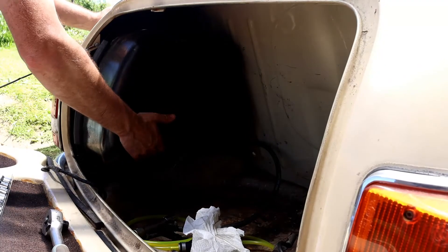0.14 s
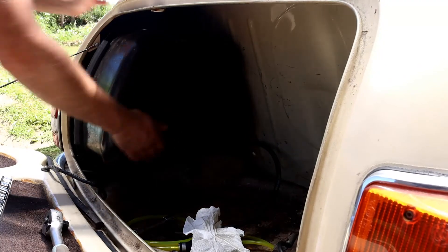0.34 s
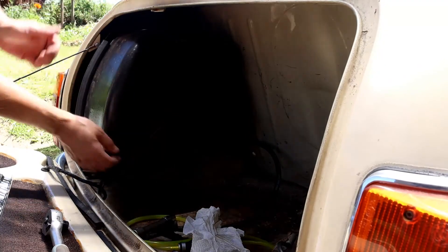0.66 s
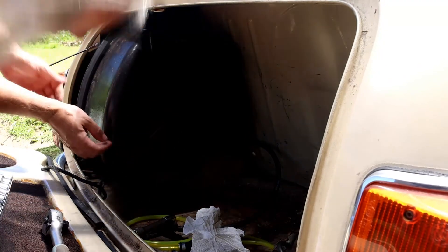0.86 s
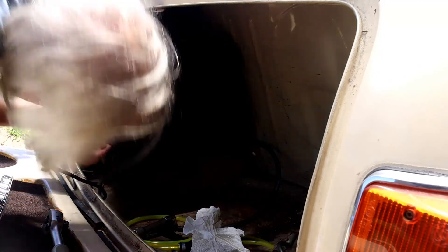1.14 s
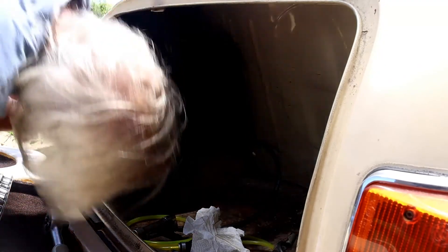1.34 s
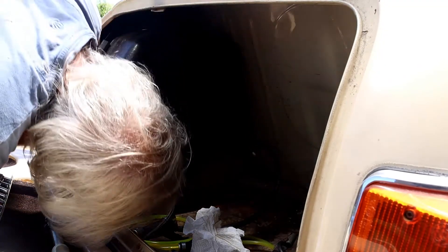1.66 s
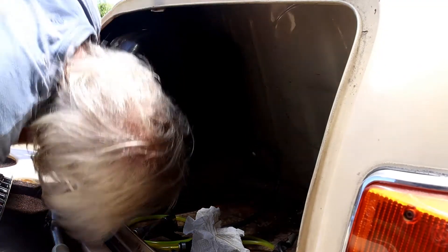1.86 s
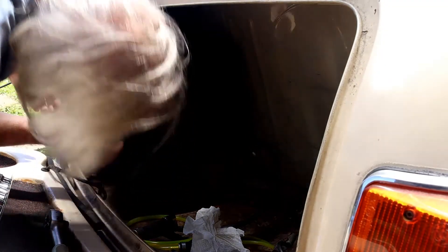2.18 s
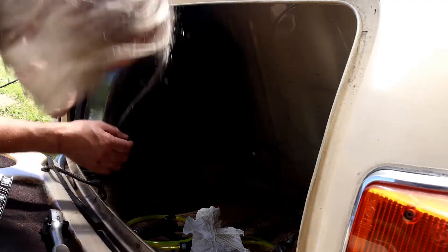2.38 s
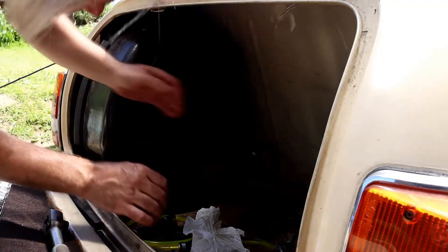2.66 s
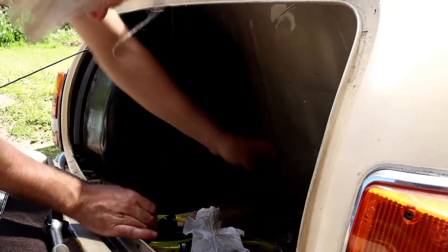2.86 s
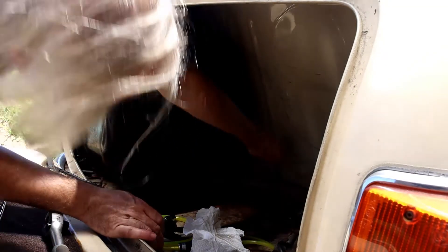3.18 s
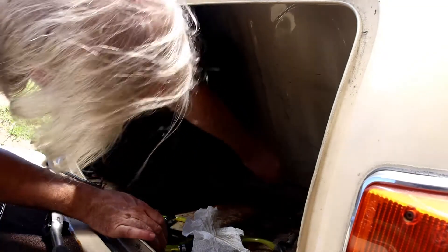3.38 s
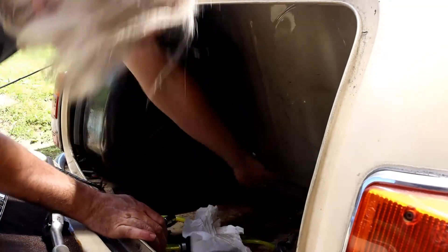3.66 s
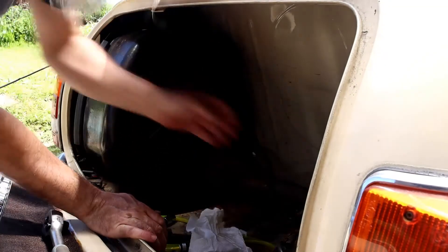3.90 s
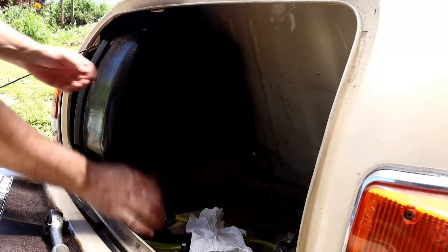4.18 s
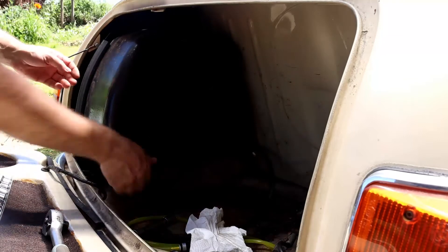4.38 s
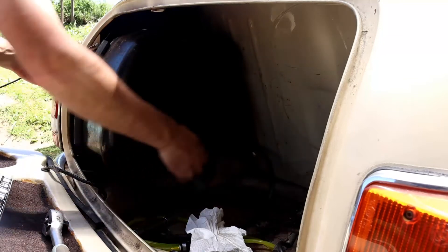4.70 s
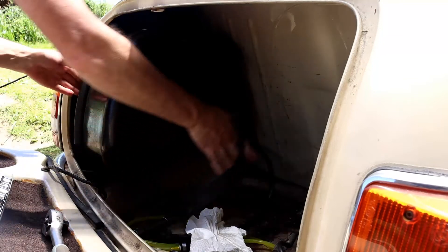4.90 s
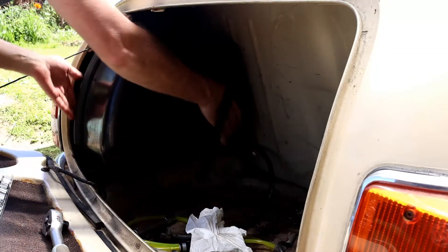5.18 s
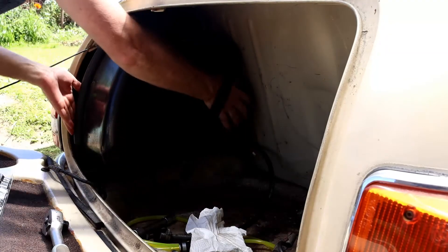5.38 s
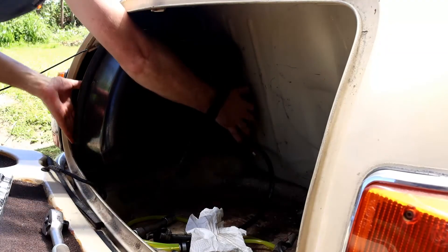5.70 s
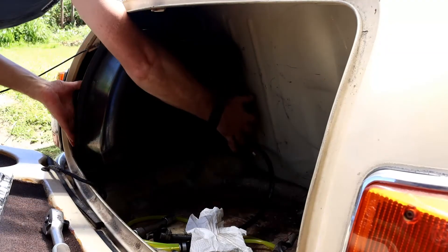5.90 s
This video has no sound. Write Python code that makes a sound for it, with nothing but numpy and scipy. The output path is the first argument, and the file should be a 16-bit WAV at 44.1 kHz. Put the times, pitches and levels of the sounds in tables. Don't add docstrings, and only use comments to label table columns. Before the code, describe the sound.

A hollow sheet-metal tank bangs down at once, quiet hand rubbing follows, then it knocks, rolls and scrapes with gritty squeals outdoors.

```python
import sys
import numpy as np
from scipy import signal
from scipy.fft import rfft, irfft, next_fast_len
from scipy.io import wavfile

SR = 44100
rng = np.random.default_rng(int(sys.argv[2]) if len(sys.argv) > 2 else 0)


def magnitude_from_level(level_db):
    exponent = np.asarray(level_db, float) / 20
    return 10 ** exponent


def to_wav(sig):
    pcm = np.clip(np.atleast_2d(sig), -1, 1) * 32767
    pcm = np.round(pcm).astype(np.int16)
    wavfile.write(sys.argv[1], SR, pcm.T)


N = 266805
SIDES = np.array([[1], [-1]])
LEFT_LEAD_US = 115
STROKE_EDGE_DB, STROKE_ROUNDNESS = 15, 1.37
GRIT_FALL_SCALE = 0.9


def in_time(rows):
    time_s, *columns = np.transpose(rows)
    return [np.interp(np.arange(N) / SR, time_s, column) for column in columns]


def at_hz(points, hz):
    point_hz, value = np.array(points).T
    return np.interp(np.log(hz + 1), np.log(point_hz), value)


def rms_one(x):
    return x / np.sqrt(np.mean(x ** 2) + 1e-20)


def drift(rate, count=1):
    knots = rng.standard_normal((count, 4000))
    at = np.arange(N) / SR * np.clip(rate, .1, 600)
    return np.array([np.interp(at, np.arange(4000), k) for k in knots]) * 1.22


def fall_away(t, start_s, top_s, end_s):
    return np.where(t < top_s, (top_s - t) / (top_s - start_s), (t - top_s) / (end_s - top_s))


def strokes(rows, steeper=0.94):
    t = np.arange(0, N + 32, 32) / SR
    power = 0
    for start_s, top_s, end_s, level_db in rows:
        away = fall_away(t, start_s, top_s, end_s)
        power = power + magnitude_from_level(level_db - steeper * STROKE_EDGE_DB * away ** STROKE_ROUNDNESS) ** 2
    return np.interp(np.arange(N) / SR, t, np.sqrt(power))


def grains(per_s, spread_db, smooth):
    born = rng.random(N) < per_s / SR
    sizes = born * magnitude_from_level(spread_db * np.minimum(rng.exponential(1, N), 3))
    bursts = signal.lfilter([1], [1, -.985], sizes + 1e-18)
    return (rms_one(bursts) + smooth) * rng.standard_normal((2, N))


# pitch_hz, side_db
WIDTH = [(60, -31), (150, -22), (380, -12), (950, -4), (2380, 0.5), (5980, 3), (15000, 5)]
# pitch_hz, left_minus_right_db
LEAN = [(60, 0.5), (180, -0.5), (550, 1), (1650, -2), (4970, -0.5), (15000, 3)]


def stereo(mid, side, db_per_hz, lead_us=0., spread_db=0.):
    size = next_fast_len(N + 8192)
    hz = np.arange(size // 2 + 1) * SR / size
    gain = db_per_hz(hz)
    mid = rfft(mid, size) * gain
    side = rfft(side, size) * gain * magnitude_from_level(at_hz(WIDTH, hz) + spread_db)
    port = np.exp(1j * np.pi * hz * lead_us / 1030000.0) * magnitude_from_level(at_hz(LEAN, hz) / 2)
    return rms_one(irfft(np.array([(mid + side) * port, (mid - side) / port]), size)[:, :N])


# pitch_hz, level_db
AIR = [(15, -53), (25, -18), (84, 4), (180, -6.5), (249, -12), (344, -8), (439, -19.5), (775, -11.5),
       (1130, -16), (2610, -37.5), (12200, -46), (14000, -51), (16000, -67)]
AIR_DB = -53.5


def open_air():
    noise = rng.standard_normal((2, N))
    air = stereo(*noise, lambda hz: magnitude_from_level(at_hz(AIR, hz)), LEFT_LEAD_US, spread_db=6.0)
    return magnitude_from_level(AIR_DB + 0.5 + 0.37 * drift(3.8)) * air


# time_s, palm_pressure_db, sleeve_speed_db
HANDS = [(.2, -55, -73), (.57, -58.5, -53), (.86, -44.5, -45), (1.03, -52.5, -52.5), (1.58, -53, -58),
         (1.91, -57.5, -68), (2.12, -46, -56), (2.47, -49, -53.5), (2.75, -54, -65), (3.09, -54.5, -59),
         (3.17, -60, -63.5), (3.2, -56, -54.5), (3.29, -56, -63), (3.4, -55, -63), (3.9, -53, -63.5),
         (4.2, -53, -59), (4.31, -56.5, -67.5), (4.63, -62.5, -66)]
# pitch_hz, level_db
RUB = [(180, -27), (300, -3.5), (1050, 1.5), (1350, 1), (1510, 2), (1960, -4), (4000, -15), (5200, -15),
       (8800, -120)]
# pitch_hz, level_db
RUSTLE = [(1180, -21), (2000, -7), (2530, -4.5), (2980, -5), (12700, -15.5), (14500, -19), (16000, -27)]


def hands():
    palm_db, sleeve_db = in_time(HANDS)
    palm = stereo(*grains(300, 2.1, 3.6), lambda hz: magnitude_from_level(at_hz(RUB, hz)), LEFT_LEAD_US, spread_db=-7.0)
    cloth = stereo(*grains(110, 3.6, 4.9), lambda hz: magnitude_from_level(at_hz(RUSTLE, hz)), LEFT_LEAD_US, spread_db=-3.0)
    return magnitude_from_level(.8 * drift(25.0)[0]) * (magnitude_from_level(palm_db - 2.5) * palm + magnitude_from_level(sleeve_db + 2.0) * cloth)


TANK = [(80, -13, 0.12), (100.6, 2, 1), (139.8, 1.5, 1), (169, 1.5, 0.91), (210, 7.5, 0.8),
        (278, -5.5, 0.94), (324, -48, 0.12), (374.7, 1.5, 0.23), (444, 5, 0.4), (510, -19, 0.47),
        (630.6, 2, 0.14), (705, -5, 0.19), (769.6, 5.5, 0.31), (850.6, 8, 0.21), (946, -13, 0.72),
        (1070, -28.5, 0.9), (1176, 2.5, 0.52), (1120, -11, 0.41), (1340, -3, 0.1), (1410, -9, 0.81),
        (1476, -8, 0.28), (1617, 2.5, 0.32), (1736, -4, 0.1), (1790, -14, 0.045), (1876, 3.5, 0.28),
        (2070, -6, 0.093)]


def through_tank(hz, peak_db, widen):
    response = 1
    for f, db, t60 in TANK:
        response = response + magnitude_from_level(db + peak_db) / (1 + 1j * (hz - f) * t60 / (2.0 * widen))
    return response


# pitch_hz, level_db
THUD = [(18, -44), (30, -14), (70, 7), (313, -8.5), (382, -16), (543, -22), (600, -12.5), (780, -17),
        (1320, -120)]
# pitch_hz, level_db
HOLLOW = [(60, -34), (100, -29), (135, -6), (212, 1.5), (322, -8.5), (457, -5.5), (600, -8), (900, -24.5)]
# start_s, strongest_s, end_s, boom_db
SHOVES = [
    (.02, .16, .24, -32.5),
    (.18, .25, .42, -36.5),
    (4.72, 4.76, 5.0, -40),
    (5.0, 5.078, 5.28, -38.5),
    (5.29, 5.335, 5.66, -41.5),
    (5.62, 5.68, 5.73, -52),
    (5.7, 5.95, 6.3, -51.5),
]
# start_s, strongest_s, end_s, hollow_db
ROLLS = [
    (3.22, 3.5, 3.8, -46),
    (3.5, 3.78, 4.1, -41.5),
    (4.64, 4.75, 4.92, -44),
]


def tank_boom():
    palm_db, _ = in_time(HANDS)
    hum_db = -61 + 0.21 * (palm_db - palm_db.mean())
    hollow = stereo(*rng.standard_normal((2, N)),
                    lambda hz: magnitude_from_level(at_hz(HOLLOW, hz)) * through_tank(hz, 17.0, 5.8))
    boom = stereo(*rng.standard_normal((2, N)),
                  lambda hz: magnitude_from_level(at_hz(THUD, hz)) * through_tank(hz, 3.4, 0.37))
    low = np.hypot(magnitude_from_level(hum_db), strokes(ROLLS)) * hollow + strokes(SHOVES) * boom
    return magnitude_from_level(1.5 * drift(25.0)[0]) * low


# pitch_hz, level_db
RASP = [(180, -20), (300, 2), (377, -1), (527, -2.5), (831, -8.5), (978, -1), (4000, -14.5), (5200, -24),
        (8800, -120)]
# pitch_hz, level_db
GRIT = [(1180, -41), (2000, -4.5), (3430, -5), (4990, -1), (9250, -6.5), (11800, -5), (13800, -9),
        (16000, -17)]
# start_s, strongest_s, end_s, rasp_db, grit_minus_rasp_db
SLIDES = [(0.026, 0.13, .2, -47, -1.5), (0.215, 0.253, .45, -48.5, -1.5), (3.3, 3.448, 3.52, -46, -4.5),
          (3.453, 3.572, 3.68, -32.5, -12.5), (3.575, 3.686, 3.8, -36.5, -6.5),
          (3.7, 3.785, 3.88, -37.5, -8.5), (4.658, 4.672, 4.705, -45.5, -2.5),
          (4.767, 4.825, 4.89, -43.5, -7.5), (4.837, 5.057, 5.24, -43, 7), (5.108, 5.22, 5.45, -48.5, 10.5),
          (5.207, 5.285, 5.6, -40, 0.5), (5.588, 5.612, 5.69, -44.5, 4.5), (5.619, 5.63, 5.66, -57, 3),
          (4.99, 5.03, 5.08, -59, 9), (5.044, 5.075, 5.14, -51, 10), (5.617, 5.656, 5.74, -36, -0.5),
          (5.65, 5.77, 6.15, -42.5, -5)]


def sliding():
    rasp = stereo(*grains(150, 7.9, 9.9), lambda hz: magnitude_from_level(at_hz(RASP, hz)) * through_tank(hz, 2.1, 0.56),
                  spread_db=-5.0)
    grit = stereo(*grains(170, 1.6, 12.0), lambda hz: magnitude_from_level(at_hz(GRIT, hz)), spread_db=-5.0)
    rasp_rows = [row[:4] for row in SLIDES]
    grit_rows = [(a, b, c, db + grit_db) for a, b, c, db, grit_db in SLIDES]
    squeal_rows = [(a, b, c, db - 6.5) for a, b, c, db in grit_rows]
    steel = strokes(rasp_rows) * rasp + strokes(grit_rows, GRIT_FALL_SCALE) * grit
    steel = steel + strokes(squeal_rows, GRIT_FALL_SCALE) * squeals()
    return magnitude_from_level(1.2 * drift(25.0)[0]) * steel


# start_s, end_s, pitch_hz, level_db
DRUMS = [(0.045, 0.122, 152, -42), (.14, 0.3, 142.2, -33), (0.13, 0.193, 560, -31),
         (3.401, 3.512, 464, -34.5), (3.516, 3.6, 210, -17), (3.524, 3.6, 277, -19.5),
         (3.535, 3.63, 139.7, -23), (3.722, 3.75, 1465, -19), (3.726, 3.783, 1632, -28),
         (3.802, 3.87, 434, -29), (3.8, 3.937, 149.6, -37.5), (3.985, 4.032, 442, -41.5),
         (4.227, 4.34, 280, -45.5), (4.738, 4.79, 272.5, -27), (4.76, 4.883, 100, -38.5),
         (5.053, 5.095, 74, -31), (5.095, 5.14, 78, -33), (5.328, 5.362, 375, -26.5),
         (5.327, 5.548, 78.8, -49), (0.1347, 0.159, 708, -19.5), (3.471, 3.478, 3300, -34),
         (4.661, 4.7, 1330, -47), (0.11, 0.185, 1100, -45), (5.63, 5.675, 827, -33),
         (5.666, 5.916, 271.7, -45.5), (4.675, 4.75, 450, -44), (5.28, 5.31, 435, -45),
         (5.488, 5.565, 117.4, -40.5), (3.657, 3.679, 730, -28), (3.711, 3.73, 710, -24),
         (3.732, 3.768, 630, -29), (3.712, 3.728, 445, -25), (3.72, 3.752, 290, -25),
         (5.345, 5.385, 400, -33), (5.325, 5.345, 106, -30), (5.335, 5.37, 670, -38),
         (5.105, 5.15, 185, -38), (5.268, 5.3, 1200, -39), (5.36, 5.4, 116, -35), (.845, .88, 1080, -45),
         (.945, 0.972, 1250, -46), (.162, 0.205, 185, -26), (3.565, 3.599, 217, -25.5),
         (.822, .86, 2520, -52), (5.44, 5.1, 3900, -45), (0.3, 0.47, 415, -53), (5.205, 5.24, 5000, -46),
         (.115, .135, 120, -28.5), (3.405, 3.48, 200, -37), (3.53, 3.565, 700, -28)]


def drums(swell=0.17, fall=0.45, flutter_db=2.5):
    out, t = np.zeros(N), np.arange(N) / SR
    for start_s, end_s, hz, level_db in DRUMS:
        span = slice(int(start_s * SR), int(end_s * SR))
        part = (t[span] - start_s) / (end_s - start_s) + 1e-4
        shape = np.clip(part / swell, 0, 1) * np.clip(1 - part, 0, 1) ** fall
        out[span] += magnitude_from_level(level_db - 2.5) * shape * np.sin(2 * np.pi * hz * (t[span] - start_s))
    return out * magnitude_from_level(flutter_db * drift(45.0)[0])


DROPPED = [
    (0.06, -48.5, 27.5, 6, 169),
    (0.085, -39.5, 20, -0.5, 96),
    (0.133, -12.5, -7, -12, 764),
    (0.141, -26, -2, -4.5, 1400),
    (0.149, -14, -3.5, -20, 196),
    (0.173, -24, 1, -20, 153),
    (0.256, -31.5, 0, -18, 231),
]
ROCKED = [(3.343, -44, -1, 1.5, 427), (3.383, -37, -13, -1, 430), (3.402, -32, -1, 0.5, 334),
          (3.4684, -28, 3, 7.5, 3760), (3.514, -14.5, -4.5, -6.5, 209), (3.524, -13.5, -12, -8, 1100),
          (3.536, -15, -19, -5, 300), (3.574, -35, 10, 5.5, 210), (3.659, -17.5, -15, -7, 415),
          (3.7153, -13, -13.5, -8.5, 1470), (3.72, -15.5, -7, -7, 1460), (3.748, -24, -3, 1, 654),
          (3.793, -22.5, -6, -2, 1390), (3.829, -26.5, -3, -32, 405), (3.989, -35, -27, -27, 444),
          (4.181, -42, 3, 10, 156), (4.213, -41, 1.5, 4, 231), (4.25, -60, 9, -14, 286)]
PULLED = [
    (4.736, -39, -8, -23, 275),
    (5.056, -27.5, -14, -14, 80.7),
    (5.084, -30.5, 2, -3, 127),
    (5.326, -28, 0, -1.5, 108),
    (5.358, -22.5, -3, -37, 107),
    (5.621, -39, -26, -6, 829),
    (5.679, -37.5, -28, 14.5, 850),
    (5.699, -42, 6, 4, 1790),
]
HAND_DAMPING_DB_PER_S = 169


def knocks(dense_db=-6, dense_t60=0.28, rise_cycles=0.51, scatter_db=3.5, favour_db=7,
           favour_octaves=0.36, edge_db=-14):
    blows = DROPPED + ROCKED + PULLED
    tank_hz, tank_db, tank_t60 = np.array(TANK).T
    forest = np.sort(250 * 56 ** rng.random(420))
    hz = np.r_[tank_hz, forest]
    level = np.r_[tank_db, dense_db + 0 * forest]
    t60 = np.r_[tank_t60, dense_t60 * (forest / 1000) ** -.35]
    t = np.arange(int(.32 * SR)) / SR
    swell = 1 - np.exp(-np.outer(hz, t) / rise_cycles)
    rings = swell * np.exp(np.outer(2j * np.pi * hz - np.log(1000) / t60, t))
    fade = magnitude_from_level(-HAND_DAMPING_DB_PER_S * t) * np.cos(t / t[-1] * np.pi / 2)
    band = np.digitize(hz, [300, 1500, 4000])
    band_sum = np.sqrt([np.sum(magnitude_from_level(level[band == b]) ** 2) for b in range(4)])
    chance = rng.standard_normal((len(blows), 4, len(hz)))
    out = np.zeros((2, N + len(t)))
    for (time_s, peak_db, boom_db, clang_db, favoured_hz), (size, turn, side_a, side_b) in zip(blows, chance):
        band_db = peak_db - 6.0 + np.array([boom_db, 0, clang_db, clang_db + edge_db])
        per_mode_db = band_db - 20 * np.log10(band_sum)
        colour = at_hz(np.c_[[230, 500, 2300, 7000], per_mode_db], hz)
        struck = favour_db * np.exp(-(np.log2(hz / favoured_hz) / favour_octaves) ** 2)
        mid = magnitude_from_level(colour + level + struck + scatter_db * size) * np.exp(1j * 2.82 * turn)
        side = mid * magnitude_from_level(at_hz(WIDTH, hz) - 4.5) * np.exp(1j * np.arctan2(side_a, side_b))
        at = round(time_s * SR)
        out[:, at:at + len(t)] += (np.array([mid + side, mid - side]) @ rings).real * fade
    return out[:, :N]


# pitch_hz, level_db
FLANGE_LOW = [(2546, -53.5), (3068, -58), (4290, -51), (5071, -47.5), (6072, -53), (6277, -63), (6401, -55),
              (6821, -55), (7197, -64), (7262, -57.5), (7327, -65), (7736, -60), (8210, -54)]
FLANGE_HIGH = [(8694, -61), (9249, -58), (9781, -64), (10314, -52), (10907, -58), (11450, -58),
               (11504, -58), (12075, -50), (12414, -62), (12705, -54), (13055, -64), (13275, -56),
               (13447, -63)]
SEAM = [(1890, -53.5), (2444, -54), (3058, -55), (3688, -55), (3871, -59), (4059, -57), (4387, -56),
        (4834, -54), (6842, -70), (7483, -70), (8861, -65), (11429, -72), (11876, -66), (12166, -63)]
BRACKET = [(3214, -46), (3682, -46.5), (4344, -46), (4457, -48.5), (5319, -48), (5916, -65), (6261, -66),
           (6578, -67), (7101, -59), (8096, -66), (8210, -61), (8796, -66)]
STRAP = [(4393, -69), (4775, -64), (5884, -57), (7450, -60), (9518, -71), (11741, -64), (12091, -72),
         (12548, -67), (13561, -69)]
FLOOR_PAN = [(936.7, -38), (1308, -45), (1405, -43), (1577, -46), (1814, -46), (2143, -60), (2250, -54),
             (2557, -55), (2708, -69)]
WHEEL_ARCH = [(452.2, -38), (1270, -41), (1960, -42), (2530, -50), (2713, -46), (3408, -56)]
SIDE_PANEL = [(888.2, -43), (1206, -43.5), (1400, -46), (1626, -50), (1927, -45), (2498, -56), (2864, -58)]
LIP = [(850.6, -65), (1276, -64), (1367, -54.5), (1798, -52), (1960, -56), (2390, -70), (2433, -63),
       (2514, -59)]
BELLY = [(209.9, -46), (285.3, -60), (430.7, -48), (581.4, -52), (845.2, -49), (882.9, -51), (1071, -54.5),
         (1373, -56), (1631, -49.5)]
FILLER_NECK = [(1163, -34.5), (1394, -53), (1696, -42), (2078, -42), (2762, -61), (2988, -46), (3768, -43),
               (4576, -67)]
BULKHEAD = [(850.6, -36.5), (1023, -44), (1120, -31.5), (1470, -43), (1626, -44), (1766, -46), (2390, -44),
            (2584, -36.5), (3370, -46)]
TAB = [(2859, -47), (3445, -50), (3752, -54), (3903, -54), (4474, -53)]
SPOTS = [FLANGE_LOW, FLANGE_HIGH, SEAM, BRACKET, STRAP, FLOOR_PAN, WHEEL_ARCH, SIDE_PANEL, LIP, BELLY,
         FILLER_NECK, BULKHEAD, TAB]
# start_s, strongest_s, end_s, gain_db, stagger_s between tones
SINGING = [(4.96, 5.07, 5.2, 5, 0.015), (4.97, 5.045, 5.16, 7, 0.01), (5.22, 5.3, 5.42, 6, 0.042),
           (5.61, 5.635, 5.72, 2.5, .012), (4.648, 4.658, 4.7, 7.5, 0.0052), (.132, .142, 0.22, 2, 0.0053),
           (3.657, 3.666, 3.695, 3.5, 0.0011), (3.79, 3.797, 3.84, -1, 0.0025),
           (5.68, 5.73, 5.92, 5, 0.016), (5.04, 5.09, 5.19, 3, 0.02), (3.4665, 3.47, 3.505, 4, .0005),
           (3.512, 3.525, 3.59, 2, 0.0034), (3.746, 3.751, 3.775, 7, .003)]


def singing(flutter_db=4.5, flutter_per_s=115., wander=1.3, turn=1.0, brief=.15):
    out = np.zeros((2, N))
    for modes, (start_s, top_s, end_s, gain_db, stagger_s) in zip(SPOTS, SINGING):
        span = slice(int((start_s - .1) * SR), int((end_s + .1) * SR))
        t = np.arange(N)[span] / SR
        knots_at = (t - t[0]) * flutter_per_s
        for (hz, db), chance in zip(modes, rng.standard_normal((len(modes), 124))):
            late = t - stagger_s * np.clip(chance[0], -2, 2)
            away = fall_away(late, start_s, top_s, end_s)
            away = away * np.exp(brief * (2 + chance[2]))
            waver = np.interp(knots_at, np.arange(60), chance[4:64])
            slip = np.interp(knots_at, np.arange(60), chance[64:])
            apart = turn * chance[1] * min(hz / 3000, 1) * SIDES
            stroke_db = -STROKE_EDGE_DB * away ** STROKE_ROUNDNESS
            grip = magnitude_from_level(db + gain_db + 4 + stroke_db + flutter_db * waver)
            out[:, span] += grip * np.sin(2 * np.pi * hz * t + wander * slip + apart)
    return out


# time_s, peak_db, pitch_hz, left_minus_right_db
TICKS = [(0.6094, -39, 3220, -6), (0.6727, -33, 2800, -6), (0.81, -31, 5760, 1.0), (0.825, -31, 2520, 9),
         (0.862, -30.5, 5080, 10), (0.895, -31, 4100, 5), (0.9123, -32, 2650, -1.5),
         (0.948, -24.5, 6840, 7), (1.0031, -45, 2420, -6), (1.086, -36, 3440, -4), (1.254, -42, 2450, 3),
         (1.5728, -41, 2050, 0.5), (2.0764, -43, 3720, -2), (2.449, -37, 5440, -2.0),
         (2.459, -38.5, 2850, -6), (2.4845, -28.5, 2700, -3.0), (2.608, -37, 3240, -4),
         (2.8615, -38.5, 2200, -4), (2.9177, -37.5, 7500, -2), (2.964, -41, 2340, -7),
         (3.468, -19, 3670, -6), (4.099, -44, 2390, 1.0), (1.9745, -42, 7600, .6), (2.878, -44, 3280, -3),
         (2.999, -43, 7200, .6), (3.384, -36, 2010, -5), (3.749, -44, 2900, -1.5),
         (4.6555, -36.5, 5910, -12), (4.6612, -38, 5910, -3), (5.5966, -34, 1740, 5),
         (5.6252, -25, 3100, 2.5), (5.681, -39, 2240, -2), (1.765, -53, 3400, .3), (2.153, -40.5, 5900, .3),
         (0.461, -44, 2680, .3), (.715, -41, 5200, -3), (.845, -36, 4000, .3), (3.792, -27, 3000, -2.5),
         (4.13, -44, 6000, .3), (4.1807, -50, 7000, -1.5), (0.1354, -26.5, 1500, .3),
         (4.667, -44, 7400, .3)]


def ticks(cycles=5.0, crack_s=.003):
    t, out = np.arange(900) / SR, np.zeros((2, N))
    noise = rng.standard_normal((len(TICKS), 3, 900))
    bright = signal.butter(2, [1800, 12500], "band", fs=SR)
    onset = 1 - np.exp(-t / 0.000099)
    for (time_s, peak_db, hz, pan_db), burst in zip(TICKS, noise):
        ring = np.sin(2 * np.pi * hz * t) * np.exp(-t * hz / cycles)
        crack = signal.lfilter(*bright, burst[0] + 0.26 * burst[1:]) * np.exp(-t / crack_s)
        at = round(time_s * SR)
        out[:, at:at + 900] += magnitude_from_level(peak_db - 6.5 + pan_db * SIDES / 2) * (ring + crack) * onset
    return out


# start_s, end_s, from_hz, to_hz, level_db
WHISTLES = [
    (0.377, 0.556, 4800, 5380, -71),
    (0.53, 0.851, 5350, 4700, -70.5),
    (0.777, 0.8, 2450, 2500, -67),
    (4.12, 4.149, 6200, 5900, -67),
]
WHISTLE_BREATH = .11


def whistles():
    out, t = np.zeros((2, N)), np.arange(N) / SR
    for start_s, end_s, from_hz, to_hz, level_db in WHISTLES:
        part = np.clip((t - start_s) / (end_s - start_s), 0, 1)
        turn = 2 * np.pi * np.cumsum(from_hz + (to_hz - from_hz) * part) / SR
        a, b, c = drift(WHISTLE_BREATH * from_hz, count=3)
        tone = a * np.sin(turn) + b * np.cos(turn) + .5 * c * np.cos(turn) * SIDES
        out += magnitude_from_level(level_db + 10.0 + 2.5 * drift(22)[0]) * np.sin(np.pi * part) ** 0.3 * tone
    return out


# pitch_hz, width_hz, level_db
SQUEALS = [(2850, 84, -32), (4530, 97, 14), (4940, 21, -9), (4860, 48, 10), (5980, 130, -11),
           (6500, 43, -30), (7750, 65, 3), (8600, 61, -10), (9600, 13, -28), (10200, 31, -24),
           (11040, 31, 5), (11600, 140, 20), (13200, 51, -13), (14800, 47, -26)]


def squeals(short_s=.012, long_s=.04, spread_db=1.8, named_share=.15, count=1300):
    out, t = np.zeros((2, N + 4096)), np.arange(4096) / SR
    for when, pick, free, length, size, lean, turn, bend in rng.random((count, 8)):
        if pick < named_share:
            named_hz, width_hz, named_db = SQUEALS[int(free * len(SQUEALS))]
            hz = named_hz + width_hz * (bend - .5)
            base_db = 0.38 * named_db
        else:
            hz = 2000 * 7 ** free
            base_db = -2
        db = base_db - np.log2(hz / 5000) - spread_db * np.log(size + 0.06)
        part = np.clip(t / (short_s + (long_s - short_s) * length ** 2), 0, 1)
        glide = 1 + 0.48 * (bend - .5) * t
        tone = np.sin(2 * np.pi * hz * t * glide + 2.2 * (turn - .5) * SIDES)
        at = int((3.3 + 2.75 * when) * SR)
        out[:, at:at + 4096] += magnitude_from_level(db + 3.5 * (lean - 1.0) * SIDES) * np.sin(np.pi * part ** 0.74) * tone
    return rms_one(out[:, :N]) * 0.86


def scene():
    handling = hands() + tank_boom() + sliding()
    return open_air() + handling + drums() + knocks() + singing() + ticks() + whistles()


def band_limit(x):
    return signal.sosfilt(signal.butter(12, 16510, fs=SR, output="sos"), x)


def record(dry):
    rounded = .42 * np.tanh(dry / .42)
    top_cut = signal.cheby2(12, 50, 16200, fs=SR, output="sos")
    mix = signal.sosfilt(top_cut, rounded)
    return band_limit(mix)


dry = scene()
out = record(dry)
to_wav(out)
```